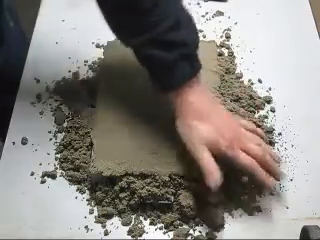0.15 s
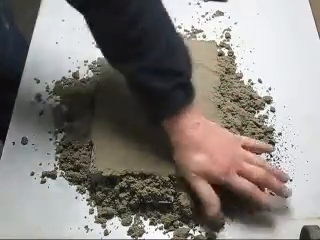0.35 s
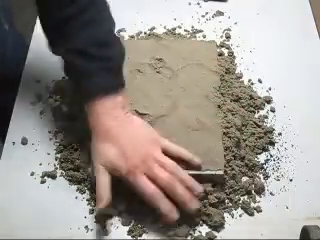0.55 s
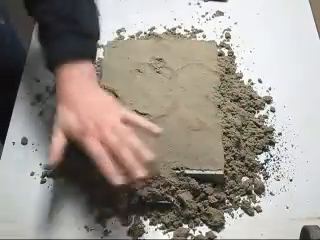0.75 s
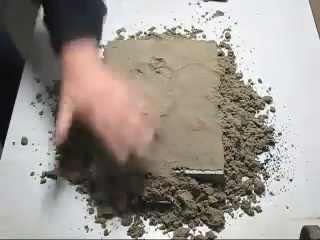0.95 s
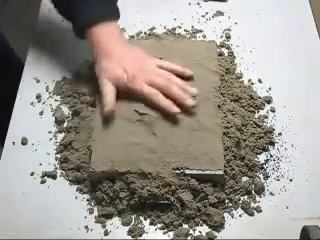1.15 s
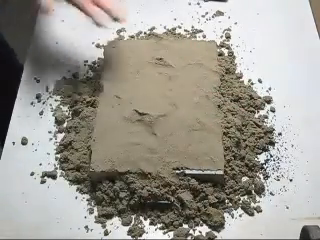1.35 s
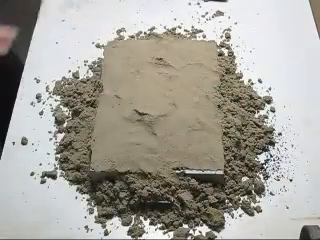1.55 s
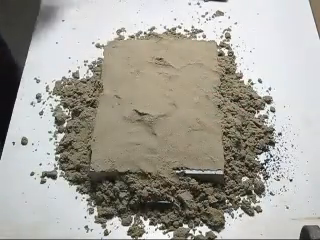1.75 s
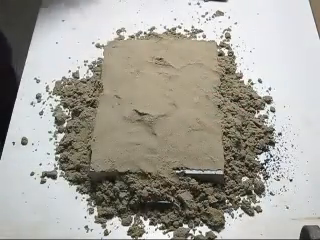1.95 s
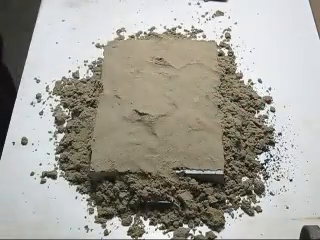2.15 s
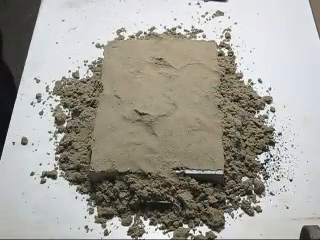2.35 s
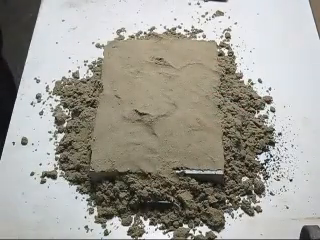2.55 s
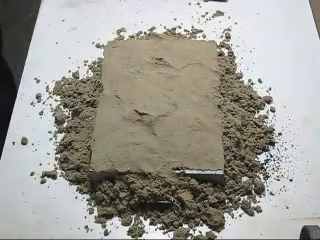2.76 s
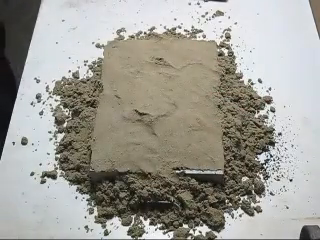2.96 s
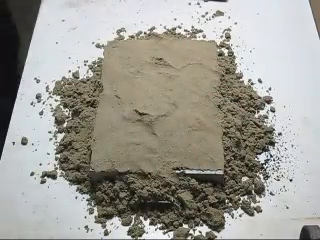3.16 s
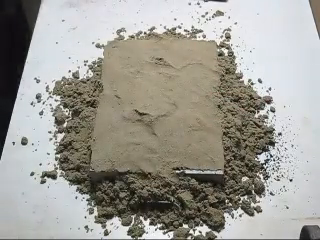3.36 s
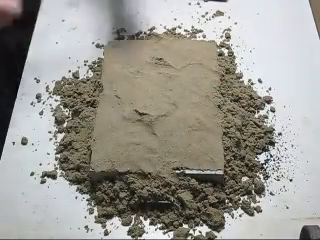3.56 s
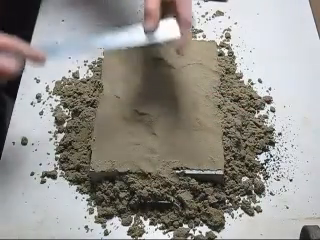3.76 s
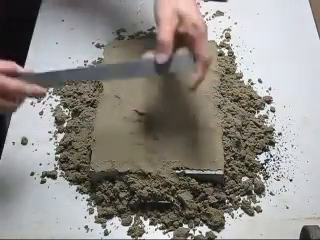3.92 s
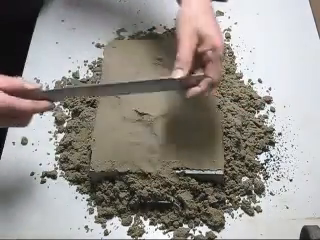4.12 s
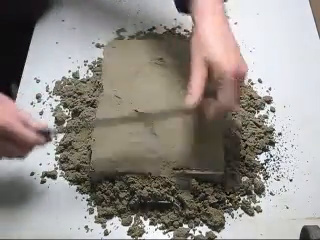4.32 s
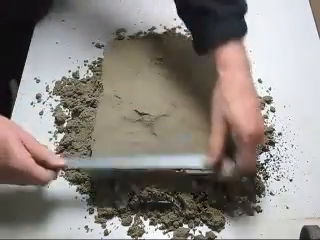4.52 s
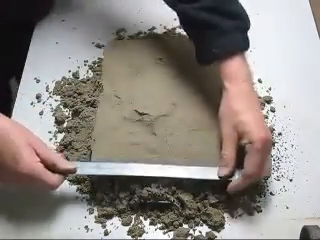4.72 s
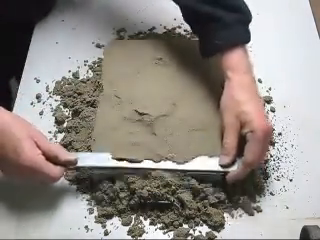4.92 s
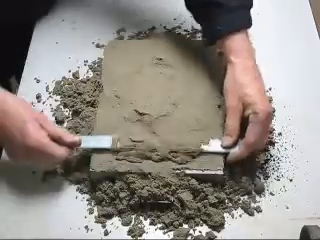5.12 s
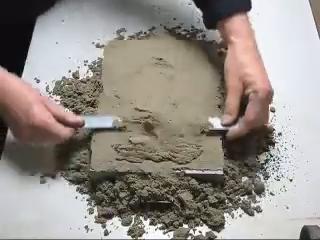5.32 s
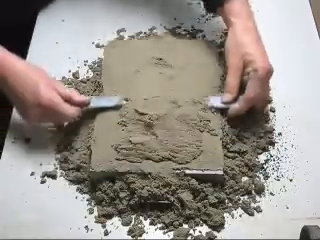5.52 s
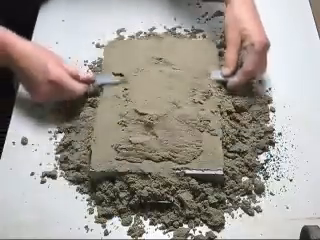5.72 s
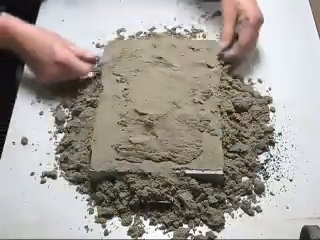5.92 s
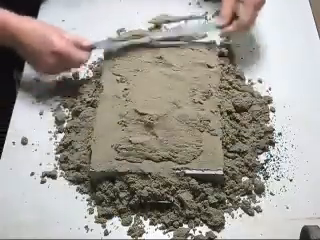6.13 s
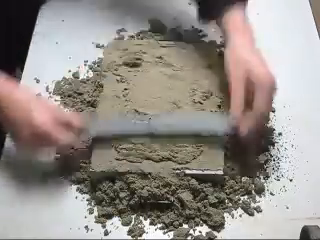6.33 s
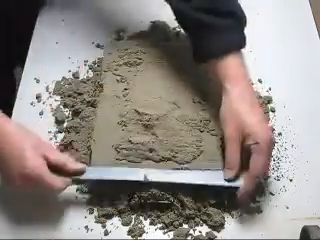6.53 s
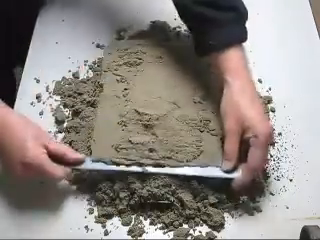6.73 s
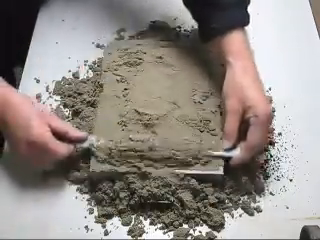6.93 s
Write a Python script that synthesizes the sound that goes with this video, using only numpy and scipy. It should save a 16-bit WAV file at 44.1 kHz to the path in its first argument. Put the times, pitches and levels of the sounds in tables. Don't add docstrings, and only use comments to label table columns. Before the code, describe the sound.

A palm thumps packed sand on a hollow tabletop five times, followed by a loud snap, clattering little knocks and quiet rustling under constant coarse hiss.

```python
import sys
import numpy as np
from scipy import signal
from scipy.fft import rfft, irfft, next_fast_len
from scipy.io import wavfile

SR = 44100
rng = np.random.default_rng(int(sys.argv[2]) if len(sys.argv) > 2 else 0)


def voltage_ratio(level):
    return 10 ** (np.asarray(level, float) / 20)


def waveform_to_disk(signal):
    frames = np.transpose(np.atleast_2d(signal))
    scaled = np.clip(frames, -1, 1) * 32767
    samples = np.round(scaled).astype(np.int16)
    wavfile.write(sys.argv[1], SR, samples)


N = 312228

# frequency in Hz, density in dB per Hz.
HISS_SPECTRUM = [(35, -17), (70, -17), (119, -13.5), (300, -10), (460, -6), (580, -2.5), (780, 0),
                 (1160, -4.5), (1800, -2), (2400, -6.5), (3150, -7.5), (3700, -12.5), (4500, -14),
                 (5400, -13), (6300, -27)]
# time in seconds, level in dB, grit above 3 kHz relative to level in dB.
HISS_LEVEL = [(0, -35.5, -11.5), (.5, -36, -11), (.85, -35, -10.5), (1.1, -37, -12.5), (1.7, -37, -10),
              (2.15, -37.5, -9.5), (2.95, -37.5, -10.5), (3.3, -36.5, -9), (3.7, -36.5, -10.5),
              (4.15, -36.5, -9), (4.6, -35, -9.5), (5.1, -35.5, -9.5), (5.7, -36, -10), (6.0, -35.5, -10.5),
              (6.45, -35.5, -10), (7.08, -37, -9.5)]
# peak time in seconds, swell in seconds, fade in seconds,
# level rise in dB, grit rise in dB.
RUSTLES = [
    (0.441, 0.018, .05, 1.5, -2),
    (1.19, 0.079, 0.047, 0, 6.5),
    (2.201, 0.055, 0.25, 1.5, 6.5),
    (2.667, 0.031, 0.06, 0, 7.5),
    (3.35, .04, 0.044, 1, -0.5),
    (3.789, .06, 0.2, 2.5, 5),
    (4.449, 0.19, 0.12, 1.5, -0.5),
    (6.577, .06, 0.025, 0.5, 7.5),
]
# start in seconds, depth in dB, drop, wait and climb in seconds.
DUCKS = [
    (0.302, 3, 0.064, 0.029, 0.043),
    (1.115, 2.5, 0.037, 0.074, 0.66),
    (2.2432, 16, 0.00041, 0.083, 0.41),
    (6.583, 3, 0.00098, 0.016, 0.32),
]
# start in seconds, boom in dB, rebound in dB.
BLOWS = [
    (-.01, -24.5, -6),
    (.282, -17.5, -16),
    (0.578, -22.5, -3.5),
    (0.848, -20, -7.5),
    (1.111, -18.5, -22),
]
# frequency in Hz, width in Hz, level in dB.
BOOM_MODES = [(99.8, 13, -3.5), (130.1, 8.7, -3), (158.4, 27, -2.5)]
# start in seconds, peak in dB, hollow pitch in Hz,
# hollow t60 in seconds.
SLAPS = [(.002, -19, 445, .03), (.028, -27.5, 418, 0.021), (0.284, -13, 418, 0.022),
         (0.292, -13.5, 321, 0.012), (0.3, -12.5, 567, 0.024), (0.328, -22, 246, 0.011),
         (0.5774, -9, 753, 0.0094), (0.581, -16.5, 242.5, 0.12), (.597, -17.5, 433, 0.016),
         (.62, -25.5, 234, 0.035), (.635, -29.5, 269, 0.023), (0.849, -11, 339, 0.057),
         (0.856, -12, 360, 0.012), (0.8629, -7, 464, 0.041), (0.8711, -11.5, 450, 0.017),
         (0.883, -21, 350, 0.0099), (.909, -29.5, 358, 0.011), (1.113, -4.5, 790, 0.0099),
         (1.116, -11, 239, 0.05), (1.127, -11.5, 332, 0.012), (1.134, -7.5, 665, 0.0083),
         (1.151, -7, 500, 0.016), (1.167, -15.5, 398, .03)]
# frequency in Hz, level in dB, t60 in seconds.
TABLE_MODES = [(213.5, -11, 0.28), (271, 0, 0.14), (330.5, -7.5, 0.14), (398, -1.5, 0.087),
               (459, 1.5, 0.022), (590, -10, 0.085), (713, -9, 0.067), (831, 1.5, .06), (900, -8, 0.033)]
# start in seconds, peak in dB, t60 in seconds.
SHOVES = [(.01, -37.5, 1.1), (0.161, -38, 2), (0.318, -36, .4), (.615, -27, 0.37), (.73, -38, 1.5),
          (.87, -33.5, 0.44), (1.172, -42.5, 0.85), (1.29, -41, 1.5), (1.56, -52, 1.9), (1.87, -40, 0.43),
          (2.0, -47, .6), (2.5, -61, 3.0), (2.68, -56, 0.37), (2.81, -46.5, 0.44), (3.001, -58, 3.0),
          (3.2, -53.5, .6), (3.37, -64.5, 2)]
# frequency in Hz, t60 in seconds.
ROOM_DECAY = [(150, .9), (400, .85), (800, .75), (1500, .3), (5000, .15)]
# frequency in Hz, level in dB.
ROOM_COLOUR = [(100, -26), (200, -2), (400, 0), (900, -5.5), (1500, -15), (5000, -19.5)]
# start in seconds, peak in dB, pitch in Hz, t60 in seconds,
# snap relative to peak in dB.
TICKS = [(0.285, -14, 1175, 0.013, -16), (0.2937, -27, 1230, 0.011, -11), (0.576, -27, 1224, 0.016, -11),
         (.43, -23.5, 1870, 0.017, 2.5), (0.8485, -10, 1745, 0.01, -1.5), (1.1132, -6, 1380, 0.0074, -9.5),
         (1.1128, -12, 2160, 0.01, -9.5), (1.133, -25, 4920, 0.016, -7), (1.189, -28.5, 5500, 0.027, -7),
         (2.19, -42.5, 2310, 0.0049, 5.5), (2.656, -24.5, 3020, .008, 6.5), (3.771, -24.5, 1810, .012, 5.5),
         (4.128, -31, 1620, 0.0063, -6.5), (6.099, -22.5, 1730, 0.0058, -10)]
JOLT = (2.2444, -2.5, 2920, .003, -20)
# start in seconds, peak in dB, pitch in Hz, t60 in seconds, lower mode in dB.
KNOCKS = [(2.238, -18.5, 1182, 0.019, 2), (2.574, -35.5, 259, 0.074, -19), (2.7347, -13.5, 1130, 0.011, -1),
          (2.749, -30.5, 694, 0.064, -12), (2.739, -31, 235, 0.07, -7.5), (2.766, -24.5, 683, 0.046, -12.5),
          (2.783, -18, 1220, 0.021, -3), (2.801, -24, 784, 0.02, -8), (2.815, -21, 697, 0.024, -9.5),
          (3.35, -22, 898, 0.012, -17), (3.78, -40.5, 262.4, 0.14, -6.5), (4.46, -29, 916, .02, -18),
          (6.573, -24.5, 900, 0.033, -15), (2.199, -35.5, 198, 0.093, -1), (2.269, -43, 227, 0.093, -6),
          (3.344, -43.5, 151, 0.089, -12), (3.759, -38, 172, 0.073, -5)]
# start in seconds, height in full scale, settling in seconds.
OFFSET_JUMPS = [
    (2.2452, -.05, .004),
    (6.582, -.025, .006),
    (6.692, -.02, .005),
]
# lower edge in Hz, upper edge in Hz.
SOUNDING_HZ = [(0, 9420), (13750, 15760)]
# lower edge in Hz, upper edge in Hz.
FRINGE_HZ = (13200, 13750)


def at_hz(points, hz):
    table_hz, values = np.transpose(points)
    return np.interp(np.log(hz), np.log(table_hz), values)


def in_time(rows):
    s, *columns = np.transpose(rows)
    return [np.interp(np.arange(N) / SR, s, column) for column in columns]


def rms_one(x):
    return x / np.sqrt(np.mean(x ** 2) + 1e-20)


def drift(rate_hz):
    r = np.exp(-80 * np.pi * rate_hz / SR)
    white = rng.standard_normal(N // 40 + 2002)
    slow = signal.lfilter([1], [1, -2 * r, r * r], white)[2000:]
    return np.interp(np.arange(N) / 40, np.arange(len(slow)), rms_one(slow))


def band_pass(low_hz, high_hz, x):
    sos = signal.butter(2, [low_hz, high_hz], "band", fs=SR, output="sos")
    return signal.sosfilt(sos, x)


def bands(white):
    edges_hz = 35 * 2 ** np.arange(0, 7.6, 1 / 4)
    for k, (low, high) in enumerate(zip(edges_hz, edges_hz[1:])):
        yield np.sqrt(low * high), band_pass(low, high, white[k % 2])


def add(out, s, sound):
    at = max(round(s * SR), 0)
    out[at:at + len(sound)] += sound[:N - at]


def ring(hz, t60_s, rise_s, bend=1):
    t = np.arange(round(t60_s * SR) + 1) / SR
    decay = voltage_ratio(-60 * (t / t60_s) ** bend)
    return np.sin(2 * np.pi * hz * t) * decay * -np.expm1(-t / rise_s)


def bump(s, rise_s, hold_s, fall_s):
    corners_s = s + np.cumsum([0, abs(rise_s), abs(hold_s), abs(fall_s)])
    return np.interp(np.arange(N) / SR, corners_s, [0, 1, 1, 0])


def dying(s, rise_s, t60_s):
    t = np.maximum(np.arange(N) / SR - s, 0)
    return -np.expm1(-t / rise_s) * voltage_ratio(-60 * t / t60_s)


def duck_db():
    return -sum(depth_db * bump(s, drop, wait, climb) for s, depth_db, drop, wait, climb in DUCKS)


def resonant_noise(hz, width_hz):
    white = rng.standard_normal(N + SR)
    return rms_one(band_pass(hz - width_hz / 2, hz + width_hz / 2, white)[SR:])


def evened(noise, slack):
    swing = np.abs(signal.hilbert(noise, next_fast_len(N))[:N])
    return rms_one(noise / (swing + slack * swing.mean()))


def hiss(patchy_db, gust_db, grain_db):
    grit_at_rest_db, over_band_db = -8.5, 5
    duck_brightens = 0.3
    rustle_rumbles = 1.6
    level_db, grit_db = in_time(HISS_LEVEL)
    shapes = np.array([bump(s - swell, swell, 0, fade) for s, swell, fade, *_ in RUSTLES])
    rustle_db, rustle_grit_db = np.array(RUSTLES)[:, 3:5].T @ shapes
    level_db = level_db + rustle_db + duck_db()
    grit_db = grit_db + rustle_grit_db - duck_brightens * duck_db()
    after_blows = np.max([bump(s, 0.24, 0.17, 0.35) for s, *_ in BLOWS], axis=0)
    rumble_db = 11 * after_blows + rustle_rumbles * rustle_db
    gusts_db = gust_db * drift(18.0)
    flicker_db = grain_db * drift(110.0)
    out, power = 0, 0
    for hz, noise in bands(rng.standard_normal((2, N))):
        top = 1 / (1 + (2800 / hz) ** 4)
        low = 1 / (1 + (hz / 450) ** 4)
        band_db = at_hz(HISS_SPECTRUM, hz)
        power += np.mean(noise ** 2) * voltage_ratio(2 * band_db)
        moving_db = top * (grit_db - grit_at_rest_db + flicker_db) + low * rumble_db
        out = out + noise * voltage_ratio(band_db + moving_db + gusts_db + patchy_db * drift(7.1))
    return out * voltage_ratio(level_db + over_band_db) / np.sqrt(power)


def boom():
    stages = [(-15.5, 1.3), (-23, 4.3)]
    rise_s, rebound_s = 0.012, 0.05
    power = 0
    for s, db, _ in BLOWS:
        for stage_db, t60_s in stages:
            power = power + (voltage_ratio(db + stage_db) * dying(s, rise_s, t60_s)) ** 2
    level = np.sqrt(power)
    for s, db, rebound_db in BLOWS:
        level += voltage_ratio(db + rebound_db) * dying(s + rebound_s, 0.013, 0.27)
    modes = sum(voltage_ratio(db) * resonant_noise(hz, width_hz) for hz, width_hz, db in BOOM_MODES)
    out = level * evened(modes, 0.88)
    for s, db, _ in BLOWS:
        add(out, s, voltage_ratio(db + 6.5) * ring(133, 0.064, 0.004, bend=1.37))
    return out


def slaps():
    table_follows, table_share_db = 0.7, -17.5
    room_follows, room_share_db = 0.37, -13.5
    near, sent = np.zeros((2, N))
    chance = rng.standard_normal((len(SLAPS), len(TABLE_MODES)))
    for (s, peak_db, hollow_hz, hollow_s), spread in zip(SLAPS, chance):
        add(near, s, voltage_ratio(peak_db - 0.5) * ring(hollow_hz, hollow_s, 0.00027, bend=1.18))
        table_db = table_follows * peak_db + table_share_db
        for (hz, mode_db, t60_s), luck in zip(TABLE_MODES, spread):
            strike = np.sign(luck) * voltage_ratio(table_db + mode_db + 3.1 * luck)
            add(near, s, strike * ring(hz, t60_s, 0.0011))
        add(sent, s, voltage_ratio(room_follows * peak_db + room_share_db) * np.ones(1))
    return near, sent


def sway():
    level = np.max([voltage_ratio(db) * dying(s, 0.015, t60_s) for s, db, t60_s in SHOVES], axis=0)
    return voltage_ratio(4.5) * level * evened(resonant_noise(37.6, 14), 0.65)


def room(sent):
    t = np.arange(SR) / SR
    tail = 0
    for hz, noise in bands(rng.standard_normal((2, SR))):
        tail = tail + noise * voltage_ratio(at_hz(ROOM_COLOUR, hz) - 60 * t / at_hz(ROOM_DECAY, hz))
    return voltage_ratio(4) * signal.fftconvolve(sent, tail * -np.expm1(-t / 0.011))[:N]


def ticks():
    out, t = np.zeros(N), np.arange(400) / SR
    events = [*TICKS, JOLT]
    snaps = band_pass(900, 3200, rng.standard_normal((len(events), 400)))
    for (s, peak_db, hz, t60_s, snap_db), snap in zip(events, snaps):
        add(out, s, voltage_ratio(peak_db) * ring(hz, t60_s, 0.0003))
        add(out, s, voltage_ratio(peak_db + snap_db + 6) * snap * np.exp(-t / 0.002))
    return out


def knocks():
    near, sent = np.zeros((2, N))
    for s, peak_db, hz, t60_s, lower_db in KNOCKS:
        add(near, s, voltage_ratio(peak_db + 3.5) * ring(hz, t60_s, 0.00072))
        add(near, s, voltage_ratio(peak_db + lower_db) * ring(0.51 * hz, 0.84 * t60_s, 0.00036))
        add(sent, s, voltage_ratio(peak_db - 24) * ring(hz, 0.0023, 0.00025))
    return near, sent


def scene():
    air = hiss(patchy_db=0.7, gust_db=0.2, grain_db=0.74)
    slap, slap_sent = slaps()
    knock, knock_sent = knocks()
    table = voltage_ratio(0.7 * duck_db()) * (boom() + sway())
    echoes = voltage_ratio(0.5 * duck_db()) * room(slap_sent + knock_sent)
    return (air + table + slap + echoes + ticks() + knock)[None]


def low_pass(x):
    return signal.sosfilt(signal.butter(12, 16390, fs=SR, output="sos"), x)


def record(dry):
    slower, step, offset = 4, 1 / 128, -0.0033
    sharpen, overload = 0.15, 0.5
    x = dry[0].copy()
    for s, height, settle_s in OFFSET_JUMPS:
        add(x, s, height * np.exp(-np.arange(SR // 10) / SR / settle_s))
    x = overload * np.tanh(x / overload)
    stored = step * np.floor((x[::slower] + offset) / step)
    sharpened = np.convolve(stored, [-sharpen, 1 + 2 * sharpen, -sharpen], "same")
    held = np.repeat(sharpened, slower)
    box = np.ones(slower) / slower
    joined = np.convolve(held, np.convolve(box, box))[slower:slower + N]
    size = next_fast_len(N)
    hz = np.arange(size // 2 + 1) * SR / size
    spectrum = rfft(joined, size)
    in_fringe = (FRINGE_HZ[0] <= hz) & (hz < FRINGE_HZ[1])
    fringe = irfft(spectrum * in_fringe, size)[:N] * np.clip(2 * drift(11.0) + 0.2, 0, 1)
    passed = sum((low <= hz) & (hz < high) for low, high in SOUNDING_HZ)
    mix = irfft(spectrum * passed, size)[:N] + fringe
    return low_pass(mix[None])


dry = scene()
out = record(dry)
waveform_to_disk(out)
```